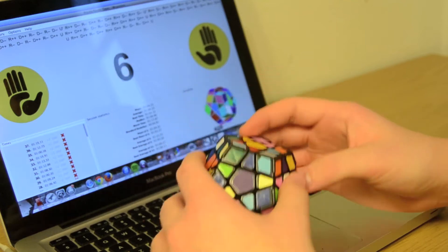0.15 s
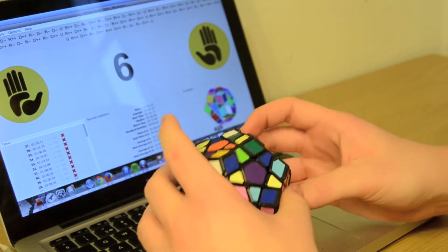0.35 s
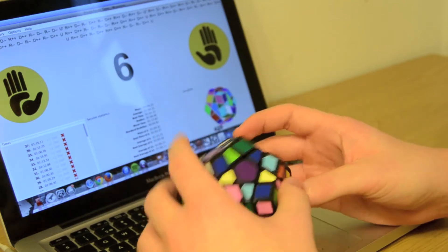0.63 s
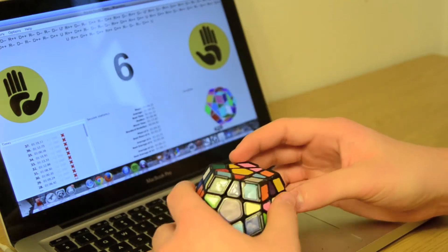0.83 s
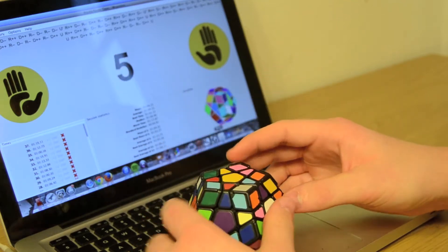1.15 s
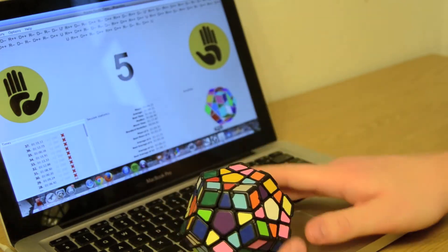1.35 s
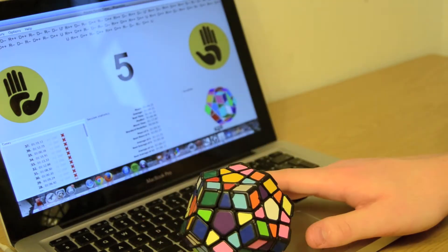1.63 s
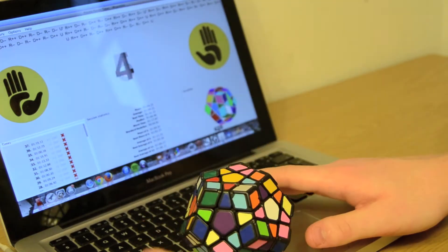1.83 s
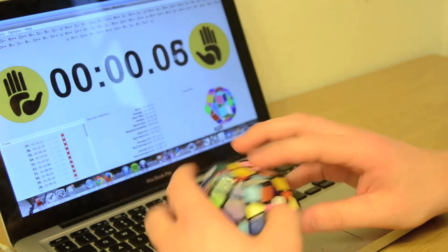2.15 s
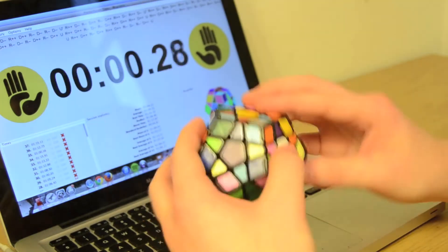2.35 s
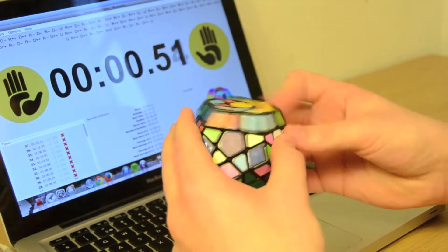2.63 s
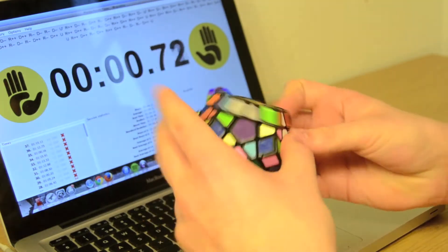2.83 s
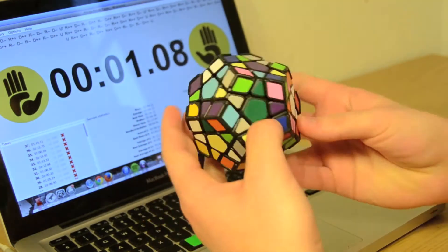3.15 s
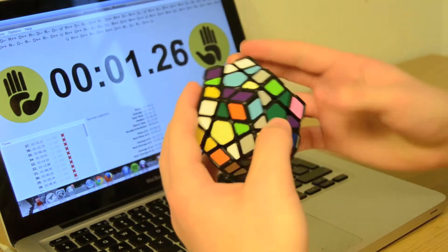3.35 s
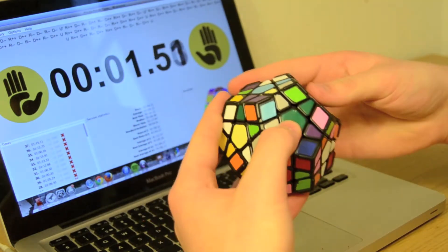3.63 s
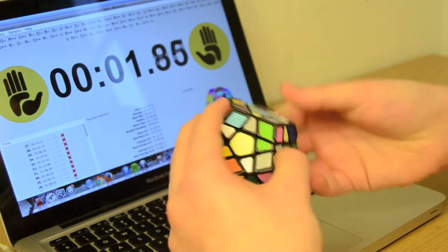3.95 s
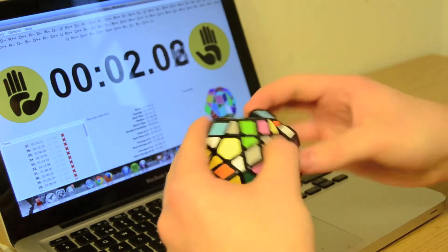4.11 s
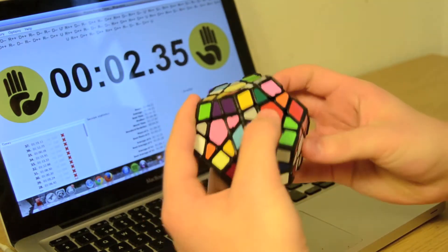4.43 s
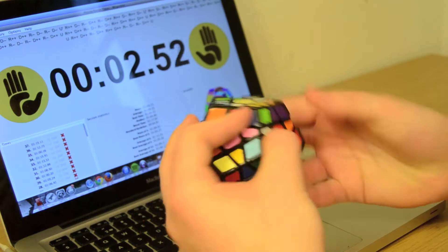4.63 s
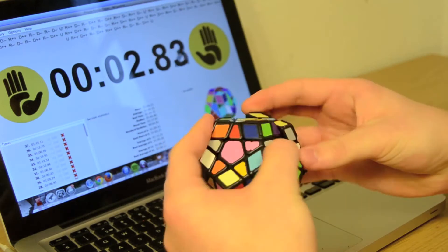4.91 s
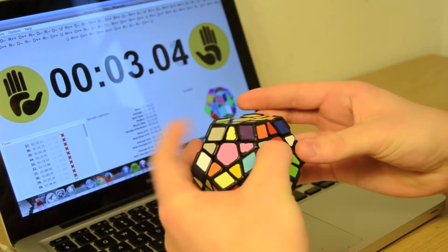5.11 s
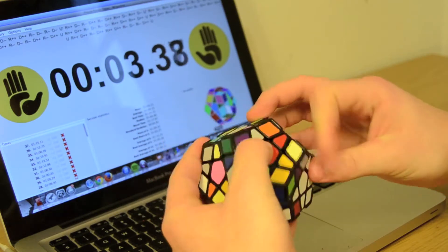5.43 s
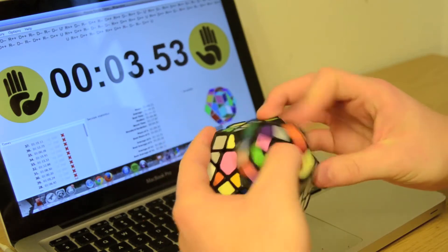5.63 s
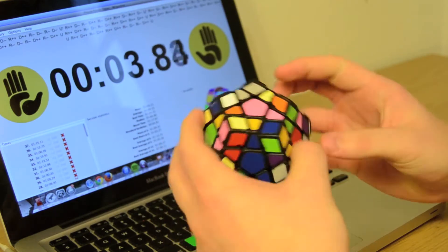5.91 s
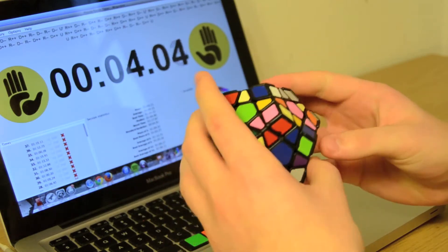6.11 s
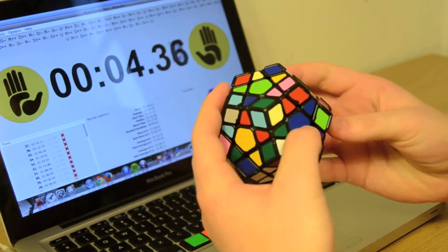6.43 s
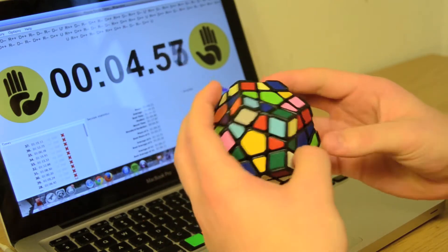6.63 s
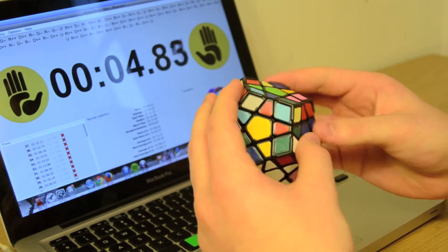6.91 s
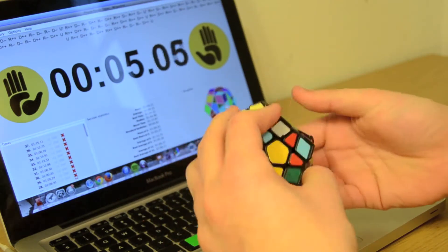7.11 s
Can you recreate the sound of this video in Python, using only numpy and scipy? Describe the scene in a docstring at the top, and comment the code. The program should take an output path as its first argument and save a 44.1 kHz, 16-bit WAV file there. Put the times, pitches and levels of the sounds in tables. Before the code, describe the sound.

A hollow plastic twisty puzzle is set down on a laptop with knocks, then grabbed and turned fast in bursts of clacks and scrapes.

```python
"""A faint steady room noise comes first, then a soft finger bump and the knocks of a twisty puzzle on a laptop.
The twelve-sided plastic puzzle is set down, picked up again and turned at speed in a small quiet room.
Knocks ring the laptop case and thump the desk; loose pieces clack in tight clusters, tick and scrape.
Hits are noise bursts shaped by plastic or case resonances, and the scrape is a stream of tiny ticks.
The walls add a short tail of decaying noise."""
import sys
import numpy as np
from scipy import signal
from scipy.fft import rfft, irfft
from scipy.io import wavfile
from scipy.ndimage import uniform_filter1d

SR = 44100
rng = np.random.default_rng(int(sys.argv[2]) if len(sys.argv) > 2 else 0)


def dump_mix(stems):
    """Bounce the given channels to the path in sys.argv[1] as a 16-bit WAV at rate SR."""
    frames = np.atleast_2d(stems).T  # one column per channel
    limited = np.clip(frames, -1, 1)  # hard clip at full scale
    pcm = np.round(limited * 32767).astype(np.int16)
    wavfile.write(sys.argv[1], SR, pcm)


N = 320166  # length in samples

# spectrum shape of the steady room noise: pitch_hz [Hz], relative density_db [dB]
QUIET_COLOUR = [(25, -31), (50, -11), (100, -7.5), (200, -2.5), (400, -1), (800, -1), (1300, -4),
                (2100, -7), (3200, -11.5), (5000, -15.5), (7000, -21), (8000, -25), (10000, -24),
                (12000, -64)]
# fingers gripping the puzzle: start_s [s], level_db [dB], pitch_hz [Hz]
GRIPS = [(0.429, -58.5, 323), (0.728, -53.5, 445), (1.953, -56, 307), (2.67, -69, 131), (3.95, -60.5, 474),
         (5.874, -62.5, 176)]
# broad colour of the room tail: pitch_hz [Hz], level_db [dB]
ROOM_COLOUR = [(100, 4), (500, 0.5), (1700, 4), (3000, 0.5), (5000, 2.5), (7500, 1), (10500, 3)]
# decay of the room tail: pitch_hz [Hz], t60_s [s]
ROOM_T60 = [(150, 0.29), (600, 0.2), (1700, 0.25), (4500, 0.24), (10000, 0.19)]
# puzzle and hands knocking on the laptop: start_s [s], level_db [dB], soft_hz (treble falls above) [Hz],
# spot_hz (pitch favoured by the struck spot) [Hz], freedom of the case to ring [0-1],
# thump_db (desk) [dB], thump_hz [Hz]
KNOCKS = [(0.719, -56.5, 2500, 2430, .3, -66, 190), (0.727, -56, 1100, 800, .3, -69, 114),
          (0.839, -36.5, 4940, 2820, 0.74, -61.5, 99), (0.844, -40.5, 1970, 830, 0.44, -69, 75),
          (0.869, -48, 3220, 2730, 0.7, -80, 100), (1.013, -34.5, 2460, 1350, 0.75, -59, 109),
          (1.048, -53, 2000, 1500, 1, -80, 101), (1.182, -57, 5600, 900, 1, -82, 88),
          (1.949, -44, 1550, 1170, 0.3, -58, 172), (2.022, -46.5, 1400, 1330, 0.34, -56, 170)]
# broad response of the laptop: pitch_hz [Hz], level_db [dB]
LAPTOP_COLOUR = [(60, -18.5), (200, -15), (350, -18), (600, -4), (1500, 0.5), (3300, -0.5), (6000, 3.5),
                 (8000, -0.5), (10500, 3)]
# resonances of the laptop with the puzzle on it: pitch_hz [Hz], width_hz [Hz], level_db over broad response [dB]
LAPTOP_MODES = [(529, 91, 23), (920, 100, -5), (1230, 80, 1), (1447, 86, 3.5), (1780, 240, 14),
                (2100, 60, -2), (2350, 84, 12), (2690, 85, 11), (4580, 450, 7), (5700, 120, 2)]
# pieces clacking: start_s [s], level_db [dB], lowest_hz (bass falls below) [Hz], main_hz (favoured pitch) [Hz],
# tilt_db (brightness) [dB per octave], spread_ms (mean delay of the later contacts) [ms]
CLACKS = [(1.941, -46.5, 810, 8900, -3.5, 3.8), (1.949, -38.5, 660, 5500, 2, 1.5),
          (2.023, -44.5, 760, 1340, 3, 5.9), (2.036, -50.5, 550, 1400, -3, 3.3),
          (2.104, -53.5, 1640, 3080, -6.5, 1.5), (2.2, -40, 1250, 5100, -2, 1),
          (2.436, -40.5, 720, 3970, 4, 0.62), (2.474, -36.5, 960, 1820, -2.5, 1.8),
          (2.626, -32, 920, 6000, 0, 3.9), (2.64, -27.5, 705, 3430, 1, 1.23),
          (2.662, -43, 1210, 4630, -1.5, 1.2), (2.805, -43.5, 1200, 4820, -2.5, 1),
          (2.84, -34.5, 860, 1090, -2.5, 4.5), (2.87, -40, 630, 4630, 1.5, 2.8),
          (2.902, -46, 630, 7480, 2, 4.9), (2.951, -42.5, 1120, 2050, 1, 2.5),
          (2.979, -49.5, 760, 4110, 0.5, 2.9), (3.008, -52, 860, 5430, 0, 2.1),
          (3.229, -38, 2780, 4030, -1, 2), (3.3, -45.5, 1450, 1830, -2, 5),
          (3.702, -49.5, 990, 1840, -2.5, 2.1), (3.726, -50.5, 670, 3100, -2.5, 4.2),
          (3.769, -45.5, 1090, 2460, -4, 4.7), (3.781, -32.5, 950, 1710, 0, 2),
          (3.891, -46.5, 760, 2700, 2, 1.6), (3.941, -53, 800, 2530, -6.5, 4.8),
          (4.04, -45, 990, 4110, -4, 3.8), (4.06, -37, 870, 4200, -1, 3.8),
          (4.079, -41.5, 990, 4450, -4, 1.3), (4.132, -41, 880, 1050, -4.5, 2.3),
          (4.154, -42, 695, 1810, -1.5, 3.5), (4.24, -55.5, 870, 4110, -0.5, 1.5),
          (4.357, -56.5, 1120, 4630, -5.5, 2.3), (4.38, -52, 1120, 1760, -4, 3.6),
          (4.501, -50.5, 550, 7500, 1.5, 1.8), (4.549, -51, 1120, 4630, -2.5, 2.3),
          (4.571, -34, 1320, 2150, -2, 2.6), (4.61, -45, 935, 5560, -2.5, 3.4),
          (4.745, -48, 1050, 4270, -0.5, 10.6), (4.8, -46, 1110, 3360, -3, 3.2),
          (4.832, -43, 760, 5650, -1.5, 2.1), (4.878, -42.5, 710, 5050, 0.5, 0.98),
          (4.964, -54, 810, 4450, -1.5, 1.1), (4.996, -43.5, 1280, 5880, -2.5, 9.3),
          (5.01, -39, 630, 1770, 4, 2), (5.015, -30, 900, 1580, -2, 3.35),
          (5.072, -46.5, 710, 4820, 1.5, 1.8), (5.175, -33.5, 1050, 4800, 2.2, 2.5),
          (5.3, -50, 1200, 5010, -4, 6.4), (5.315, -47.5, 920, 5220, -2.5, 5),
          (5.348, -40, 866, 890, -2, 1.6), (5.431, -33, 870, 910, -0.1, 1.87),
          (5.437, -34, 700, 4270, 3, 1.6), (5.455, -41.5, 1200, 4630, 0.5, 3.5),
          (5.49, -40, 805, 4820, .3, 1.9), (5.524, -31.5, 1220, 4440, 0, 1.5),
          (5.62, -31, 1100, 1870, 3.5, 1.4), (5.665, -35.5, 920, 875, -3.5, 4.8),
          (5.747, -45, 1130, 3640, 0.5, 1.1), (5.893, -41, 865, 5400, 0.5, 2.7),
          (5.931, -51.5, 2160, 4820, -6.5, 1.4), (6.079, -48, 3000, 3740, -7.5, 1.15),
          (6.251, -58, 800, 1920, -4, 2.7), (6.435, -47.5, 1690, 4560, -4.5, 3),
          (6.636, -62, 1460, 4630, -10, 2.3), (6.731, -59.5, 1050, 3670, -4, 2),
          (6.968, -42.5, 1290, 2170, -5, 3.2), (6.986, -40, 1290, 3340, -3.5, 1.7),
          (7.205, -51.5, 900, 1510, -2, 3), (7.24, -33.5, 710, 4360, 2, 5.8),
          (7.257, -27, 750, 4200, -1.5, 3.1)]
# broad response of the plastic: pitch_hz [Hz], level_db [dB]
PUZZLE_COLOUR = [(100, -18), (400, -3), (530, 2.5), (740, -9.5), (900, 2.5), (1300, -4.5), (2400, -4),
                 (3200, 1), (5000, 1), (6500, -2), (7800, -7.5), (9500, 0), (11000, -16.5)]
# resonances of the hollow puzzle: pitch_hz [Hz], width_hz [Hz], level_db over broad response [dB]
PUZZLE_MODES = [(995, 44, 1), (1040, 260, 2), (1494, 39, 2.5), (1793, 370, 6), (2240, 340, 4),
                (2680, 130, 2), (3660, 110, -0.5), (4550, 99, 3), (5680, 45, 0.5), (7290, 700, 5),
                (8770, 200, 3.5), (9070, 36, -10)]
# loose pieces rattling while the fingers shift their hold: start_s [s], end_s [s], tick level_db [dB]
RATTLES = [(2.151, 2.429, -58.5), (2.53, 2.827, -52.5), (4.001, 4.3, -59.5), (4.299, 4.559, -59),
           (4.68, 4.978, -55.5), (5.048, 5.416, -56), (6.15, 6.329, -62), (6.382, 6.856, -67.5)]
# faces sliding round: peak_s (greatest speed) [s], level_db (scrape) [dB], run_up_s [s]
TURNS = [(2.195, -57.5, 0.04), (2.46, -52.5, 0.11), (2.65, -44, 0.073), (2.85, -45.5, 0.067),
         (3.32, -58.5, 0.068), (3.79, -53, 0.06), (4.06, -49, 0.033), (4.15, -57, .08), (4.3, -78, 0.088),
         (4.57, -55.5, .1), (4.82, -51, 0.094), (5.03, -49.5, 0.097), (5.33, -58.5, 0.032),
         (5.46, -46, 0.11), (5.66, -43.5, 0.042), (6.435, -59, 0.028), (6.98, -43, 0.032),
         (7.255, -42, 0.027)]

QUIET_DB = -65
TOP_HZ = 10900
LEVEL_WINDOW_S = .01  # a hit's level is its energy held over this time
HIT_SIZE = 4096  # samples
HIT_T = np.arange(HIT_SIZE) / SR
RUN_UP_DB, BRAKE_DB_PER_S = 15.5, 226  # scrape swells by this much over the run-up, then dies as the face seats


def undb(db):
    """Decibels to gain."""
    return 10 ** (np.asarray(db) / 20)


def freqs(size):
    """Frequencies of a spectrum of so many samples, kept above zero."""
    return np.maximum(np.fft.rfftfreq(size, 1 / SR), 1)


def contour(points, hz):
    """Read (Hz, value) points on a log-frequency axis."""
    at, value = np.transpose(points)
    return np.interp(np.log(hz), np.log(at), value)


def fade(t, t60):
    """Exponential decay that loses 60 dB in t60 seconds."""
    return np.exp(-np.log(1000) * t / t60)


def through(x, response):
    """Pass a sound through an impulse response."""
    return signal.fftconvolve(x, response)[:len(x)]


def ring(db):
    """Causal impulse response with the given spectrum, by way of the cepstrum."""
    cepstrum = irfft(np.log(undb(db)))
    # fold the time-reversed half forward, so the ring starts at once
    cepstrum[1:HIT_SIZE // 2] *= 2
    cepstrum[HIT_SIZE // 2 + 1:] = 0
    return irfft(np.exp(rfft(cepstrum)))


def add(out, s, hit, db):
    """Mix in a hit whose energy equals db held over the level window."""
    start = int(np.clip(s * SR, 0, N - 1))
    gain = undb(db) * np.sqrt(LEVEL_WINDOW_S * SR / np.sum(hit ** 2))
    out[start:start + len(hit)] += gain * hit[:N - start]


def quiet():
    """Steady soft noise of the room."""
    noise = irfft(rfft(rng.standard_normal(N)) * undb(contour(QUIET_COLOUR, freqs(N))), N)
    return noise / np.std(noise) * undb(QUIET_DB)


def grips(t60=0.14, octaves=0.36):
    """Fingertips land on the puzzle with a dull, damped bump: decaying noise around one pitch."""
    out, hz = np.zeros(N), freqs(HIT_SIZE)
    for s, db, pitch_hz in GRIPS:
        push = fade(HIT_T, t60) * rng.standard_normal(HIT_SIZE)
        peak_db = -20 * np.log10(1 + (np.log2(hz / pitch_hz) / octaves) ** 2)
        add(out, s, through(push, ring(peak_db)), db)
    return out


def room(x, wet_db=-8.5, full_tail_s=0.011, count=12):
    """Close walls return a dense tail whose treble dies soonest."""
    size = SR // 2
    t, hz = np.arange(size) / SR, freqs(size)
    noise = rfft(rng.standard_normal(size))
    centres = np.geomspace(100, 11000, count)
    t60s, colour = contour(ROOM_T60, centres), undb(contour(ROOM_COLOUR, hz))
    tail = 0
    # overlapping bands, each dying at its own rate
    for t60, share in zip(t60s, np.eye(count)):
        weight = np.interp(np.log(hz), np.log(centres), share)
        band = irfft(noise * colour * weight, size)
        tail = tail + band * fade(t, t60)
    # silent for half of full_tail_s, then rising
    onset = np.clip(2 * t / full_tail_s - 1, 0, 1)
    typical_size = np.linalg.norm(fade(t, np.median(t60s)))
    return through(x, undb(wet_db) * tail * onset / typical_size)


def moving_room(x, move_s=0.452, count=3):
    """As the hands move, the puzzle crossfades in a steady cycle between places with their own echo patterns."""
    place = np.arange(N) / SR / move_s
    wet = np.zeros(N)
    for k in range(count):
        distance = np.abs((place - k + count / 2) % count - count / 2)
        share = np.sqrt(np.maximum(1 - distance, 0))
        wet += room(x * share)
    return wet


def body_db(colour, modes):
    """Response of an object: resonant peaks standing on a broad colour."""
    hz = freqs(HIT_SIZE)
    peaks = sum(db / (1 + (2 * (hz - f) / width) ** 2) for f, width, db in modes)
    return contour(colour, hz) + peaks


def favour(hz, centre_hz, db, octaves):
    """The spot that is struck feeds the resonances around one pitch more than the rest."""
    return db * np.exp(-(np.log2(hz / centre_hz) / octaves) ** 2)


def contacts(spread_ms, t60, rebound, rebound_s, snap, snap_t60, count=3):
    """A few quick contacts set small parts ringing, with one hard snap among them and a rebound."""
    chance = rng.random(count + 1)
    later = (np.arange(1, count) + chance[2:] - .5) / count * 2 * spread_ms / 1000
    starts = np.append(0, later)
    rebound_start = rebound_s * (.5 + chance[0])
    snap_start = starts[1] * (.5 + chance[1] / 2)
    starts = np.append(starts, [rebound_start, snap_start])
    sizes = np.append(rng.uniform(0.7, 1, count), [rebound, snap])
    decays = np.append(np.full(count + 1, t60), snap_t60)
    age = HIT_T - starts[:, None]
    envelopes = sizes[:, None] * (age >= 0) * fade(np.abs(age), decays[:, None])
    power = np.sum(envelopes ** 2, axis=0)
    return np.sqrt(power) * rng.standard_normal(HIT_SIZE)


def even_out(x, width_hz):
    """Give a burst the same energy in every broad band while its narrow peaks stay random."""
    width_bins = max(int(width_hz * HIT_SIZE / SR), 2)
    power = uniform_filter1d(np.abs(rfft(x)) ** 2, width_bins)
    return through(x, ring(-10 * np.log10(power + 1e-12)))


def knocks():
    """Each knock rings the laptop case unless a resting hand damps it; the desk answers with a slow thump."""
    out, hz = np.zeros(N), freqs(HIT_SIZE)
    broad = contour(LAPTOP_COLOUR, hz)
    peaks = body_db(LAPTOP_COLOUR, LAPTOP_MODES) - broad
    t = np.arange(SR // 4) / SR
    for s, db, soft_hz, spot_hz, freedom, thump_db, thump_hz in KNOCKS:
        blow = contacts(spread_ms=0.76, t60=0.045, rebound=0.36, rebound_s=.005, snap=2.8, snap_t60=0.007)
        # a soft contact lasts longer and so holds less treble
        softness = -10 * np.log10(1 + (hz / soft_hz) ** 4)
        case = broad + freedom * peaks + favour(hz, spot_hz, db=7, octaves=0.36)
        add(out, s, through(even_out(blow, width_hz=400), ring(case + softness)), db)
        swell = 1 - np.exp(-t / .015)
        thump = np.sin(2 * np.pi * thump_hz * t) * fade(t, 0.16) * swell
        add(out, s, thump, thump_db)
    return out


def clack(shell_db, lowest_hz, main_hz, tilt_db, spread_ms):
    """Pieces snap against their neighbours: a whole face rings low, a single piece only high."""
    hz = freqs(HIT_SIZE)
    # small parts radiate little below their lowest resonance; the loss stops near -24.75 dB
    bass_loss = 10 * np.log10(1 / (1 + (lowest_hz / hz) ** 6) + 10 ** (-24.75 / 10))
    tilt = tilt_db * np.log2(np.maximum(hz, 500) / 4000)
    spot = favour(hz, main_hz, db=5, octaves=0.21)
    blow = contacts(spread_ms, t60=0.03, rebound=0.59, rebound_s=0.0063, snap=1.96, snap_t60=0.0041)
    burst = even_out(blow, width_hz=1150)
    return through(burst, ring(shell_db + bass_loss + tilt + spot))


def clacks():
    """The distinct clacks of faces catching and snapping home, rung through the hollow shell."""
    out, shell = np.zeros(N), body_db(PUZZLE_COLOUR, PUZZLE_MODES)
    for s, db, lowest_hz, main_hz, tilt_db, spread_ms in CLACKS:
        add(out, s, clack(shell, lowest_hz, main_hz, tilt_db, spread_ms), db)
    return out


def scattered(start_s, end_s, count):
    """Uneven moments, one in each equal part of a stretch of time."""
    return start_s + (end_s - start_s) * (np.arange(count) + rng.random(count)) / count


def rattle(scatter_db=2, low_hz=1400, high_hz=5400):
    """Loose pieces tick at uneven moments, each with its own strength and pitch."""
    out, shell = np.zeros(N), body_db(PUZZLE_COLOUR, PUZZLE_MODES)
    for start_s, end_s, db in RATTLES:
        for s in scattered(start_s, end_s, count=6):
            pitch_hz = low_hz * (high_hz / low_hz) ** rng.random()
            tick = clack(shell, lowest_hz=1100, main_hz=pitch_hz, tilt_db=-4.0, spread_ms=2.2)
            add(out, s, tick, db + scatter_db * rng.standard_normal())
    return out


def turning():
    """Strength of the scrape: each face gathers speed over its run-up and is braked as it seats."""
    t = np.arange(N) / SR
    strength = np.zeros(N)
    for s, db, run_up_s in TURNS:
        # the larger loss applies: run-up before the peak, braking after it
        loss_db = np.maximum(RUN_UP_DB * (s - t) / run_up_s, BRAKE_DB_PER_S * (t - s))
        strength += undb(db - loss_db)
    return strength


def sliding(grains_per_s=900, scatter_db=5.0, lowest_hz=850):
    """Edges catch and slip as a face turns: a stream of tiny uneven ticks into the puzzle's shell."""
    hz = freqs(HIT_SIZE)
    sizes = undb(scatter_db * np.minimum(rng.exponential(size=N), 2.8))
    ticks = (rng.random(N) < grains_per_s / SR) * sizes * rng.choice([-1, 1], N)
    bass_loss = -10 * np.log10(1 + (lowest_hz / hz) ** 6)
    tilt = -2.53 * np.log2(hz / 4000)  # dB per octave
    shell = body_db(PUZZLE_COLOUR, PUZZLE_MODES) + bass_loss + tilt
    pieces = even_out(fade(HIT_T, 0.011) * rng.standard_normal(HIT_SIZE), width_hz=520)
    scrape = through(ticks, through(pieces, ring(shell)))
    return scrape / np.std(scrape) * turning()


def scene():
    """Puzzle and laptop heard close, with the room behind them."""
    near = grips() + knocks() + clacks() + rattle() + sliding()
    return (quiet() + near + moving_room(near))[None]


def record(dry):
    """A steep low-pass cuts the top octave."""
    low_pass = signal.ellip(8, .3, 60, TOP_HZ, fs=SR, output="sos")
    return signal.sosfilt(low_pass, dry)


dry = scene()
out = record(dry)
dump_mix(out)
```